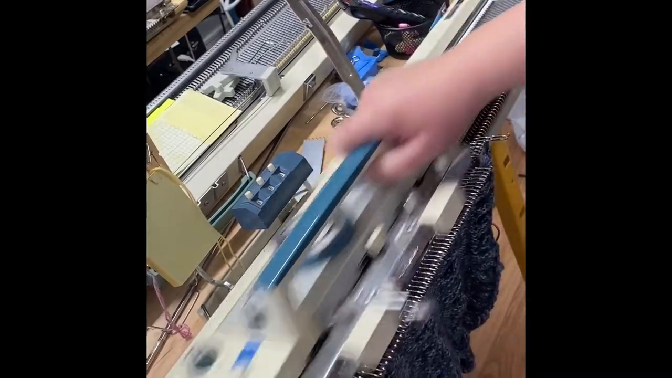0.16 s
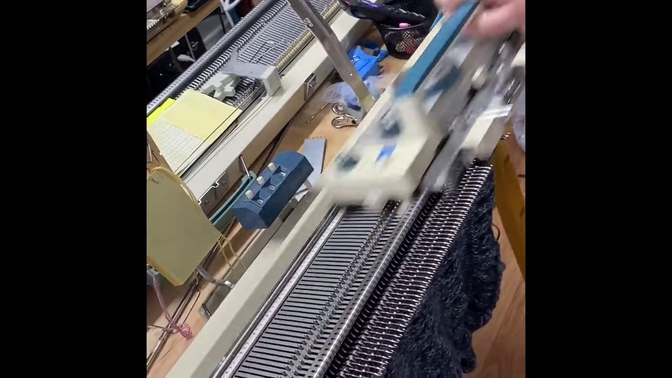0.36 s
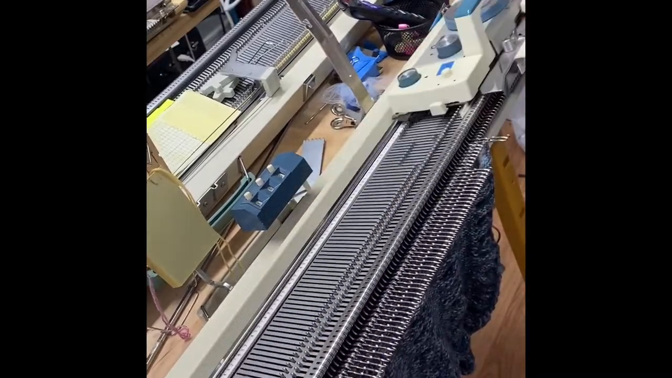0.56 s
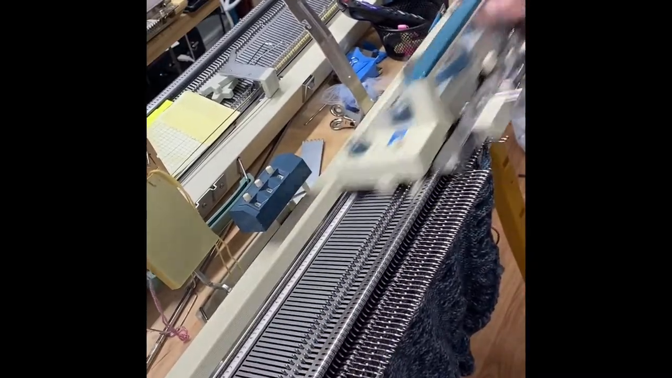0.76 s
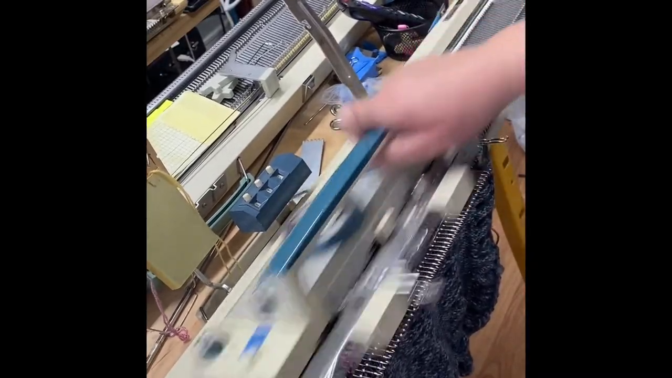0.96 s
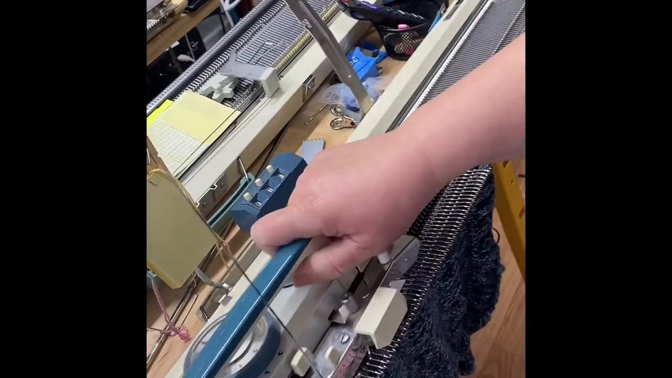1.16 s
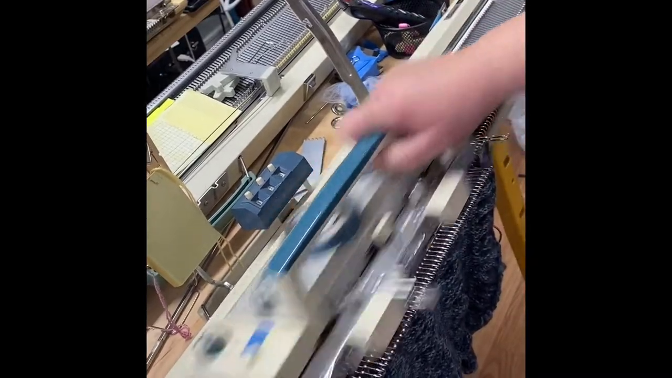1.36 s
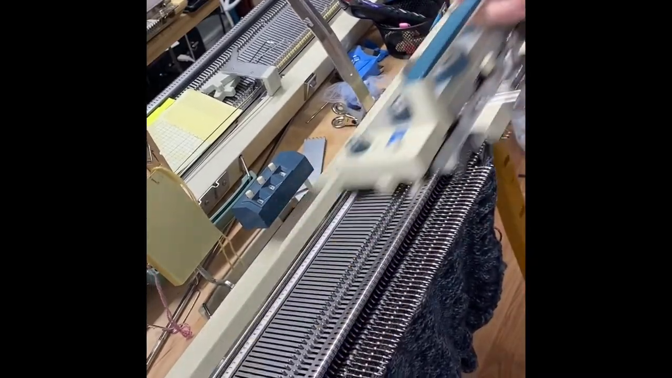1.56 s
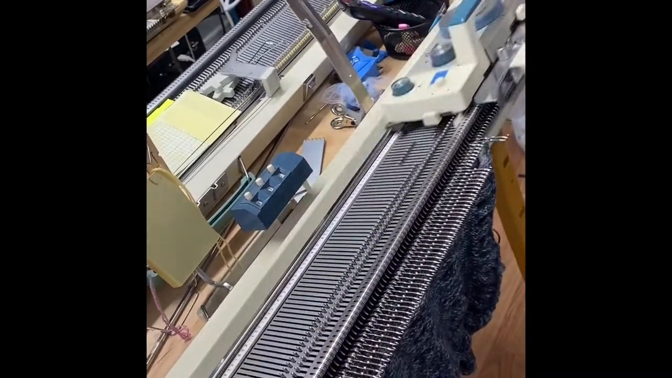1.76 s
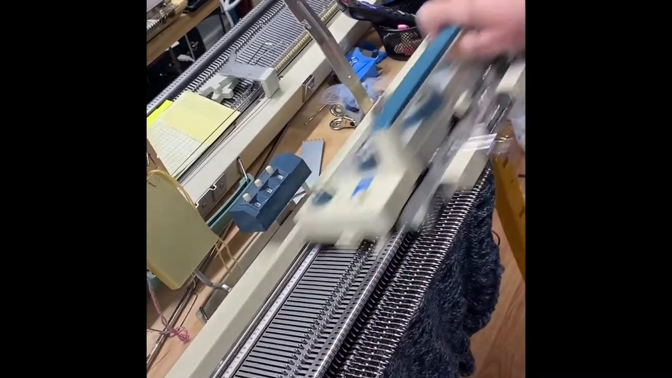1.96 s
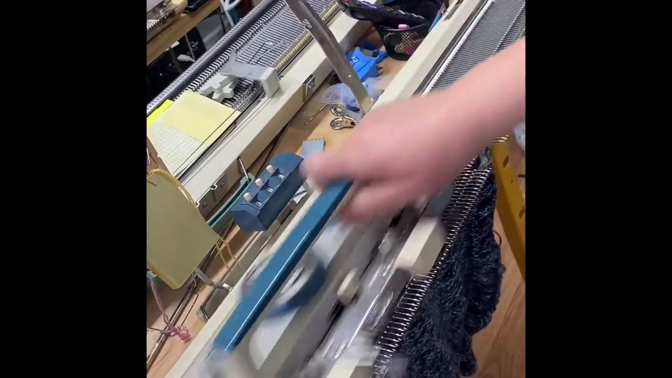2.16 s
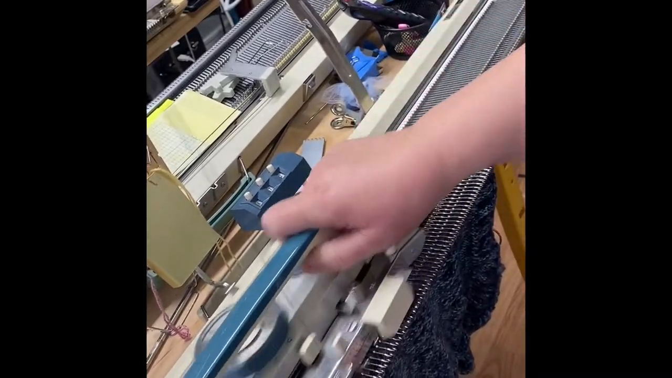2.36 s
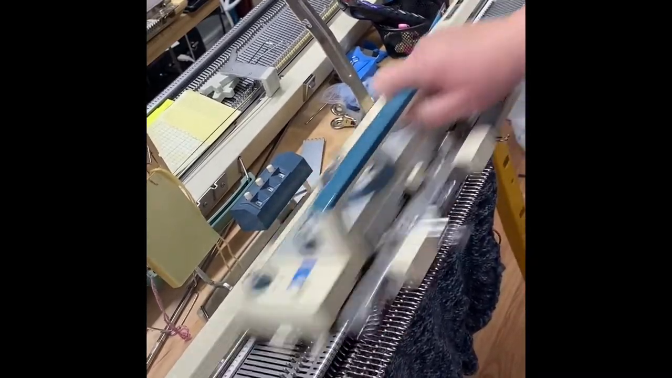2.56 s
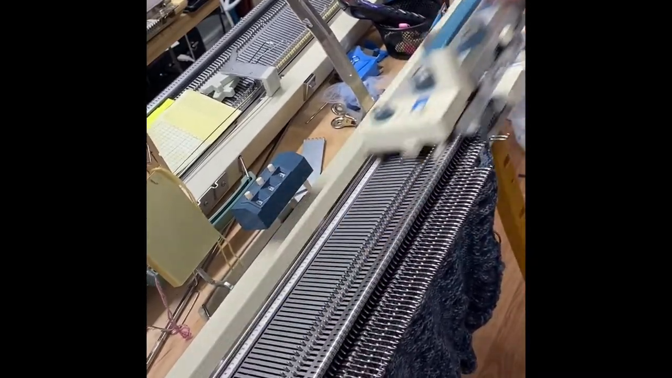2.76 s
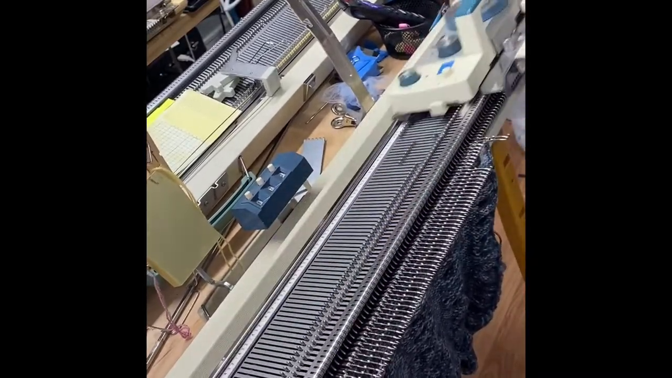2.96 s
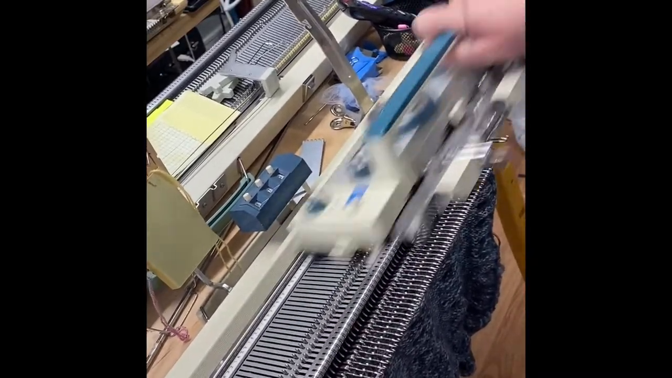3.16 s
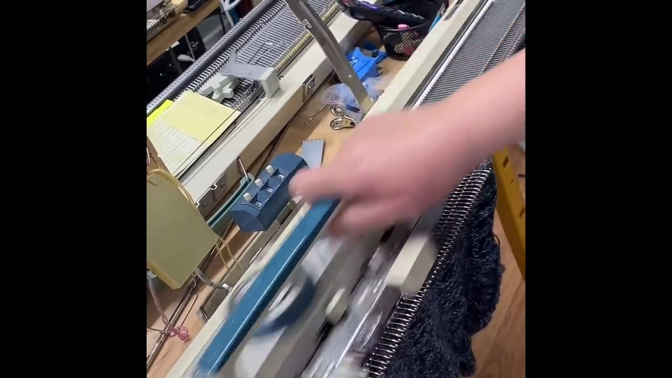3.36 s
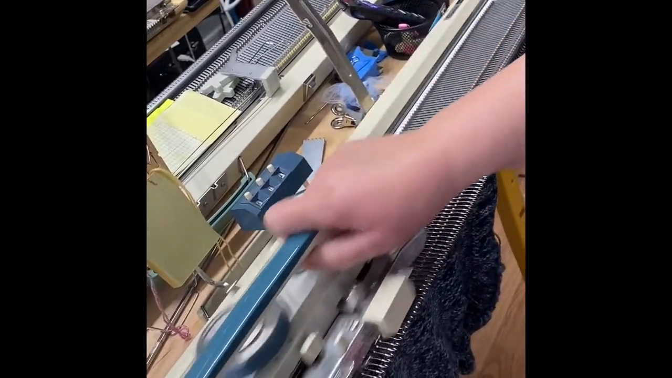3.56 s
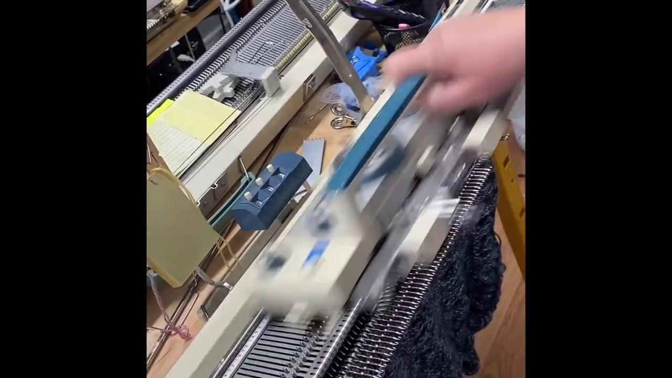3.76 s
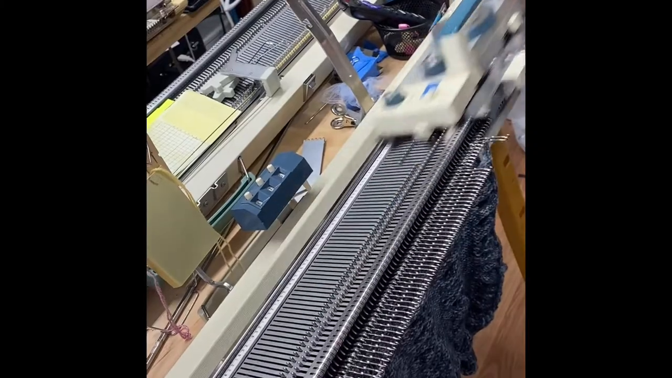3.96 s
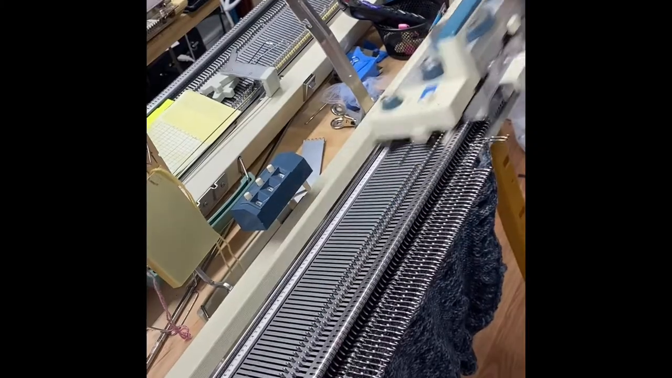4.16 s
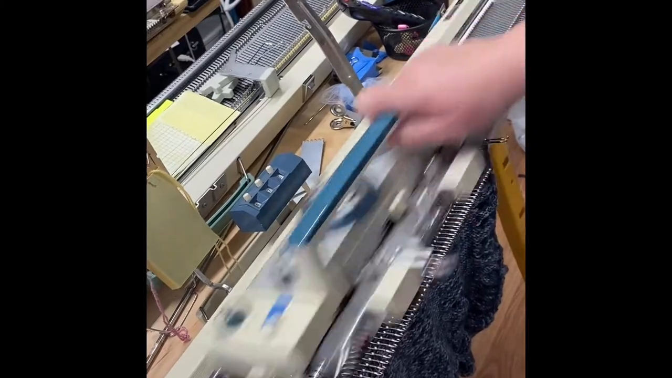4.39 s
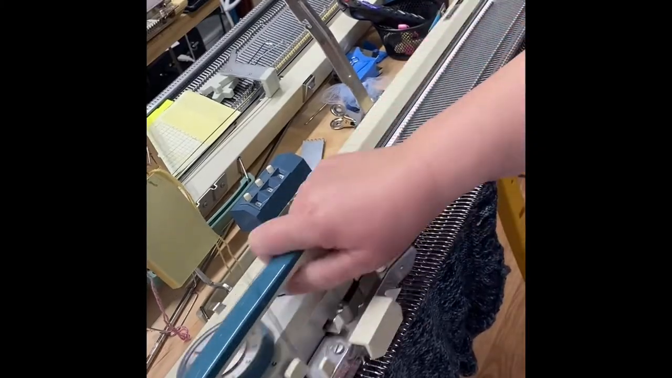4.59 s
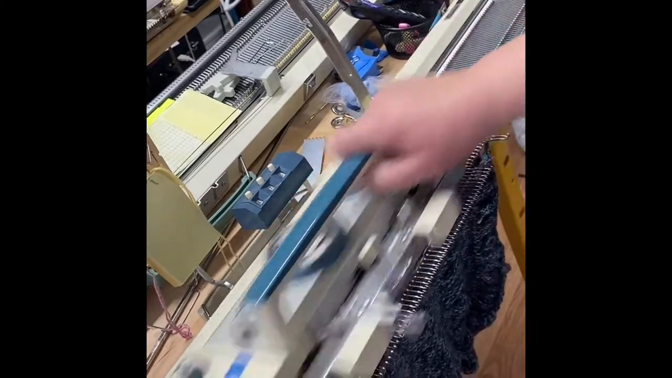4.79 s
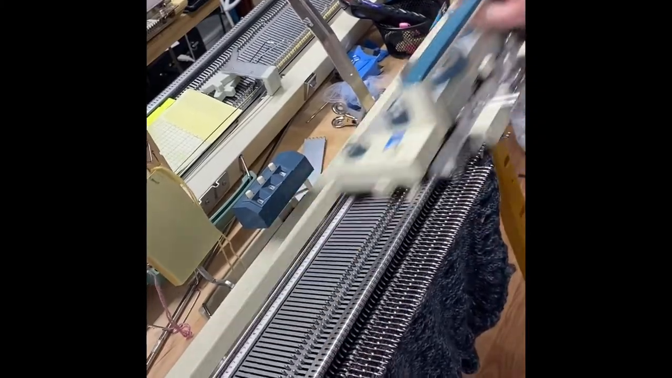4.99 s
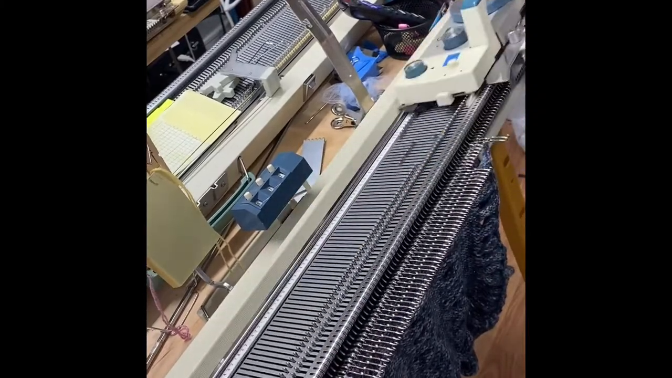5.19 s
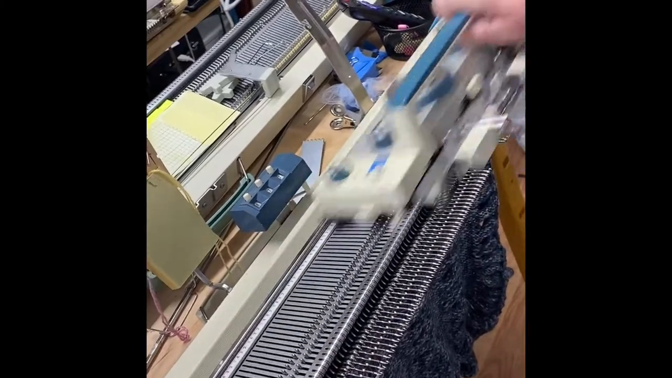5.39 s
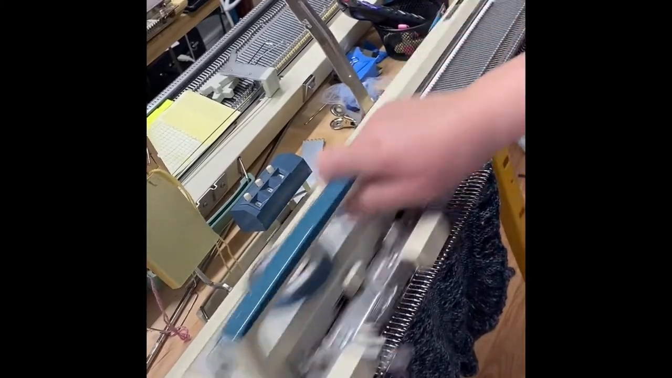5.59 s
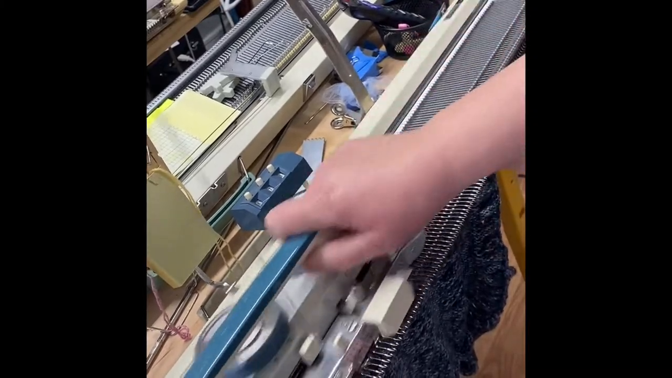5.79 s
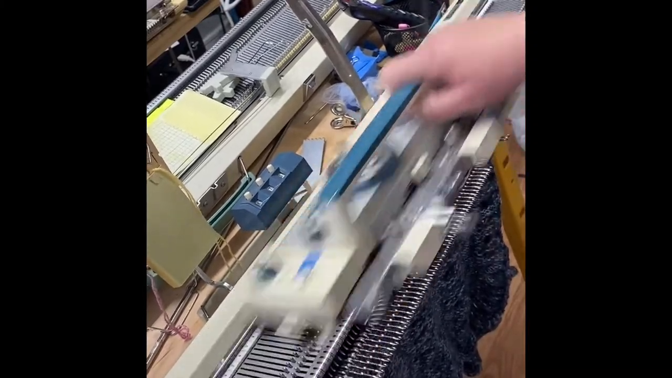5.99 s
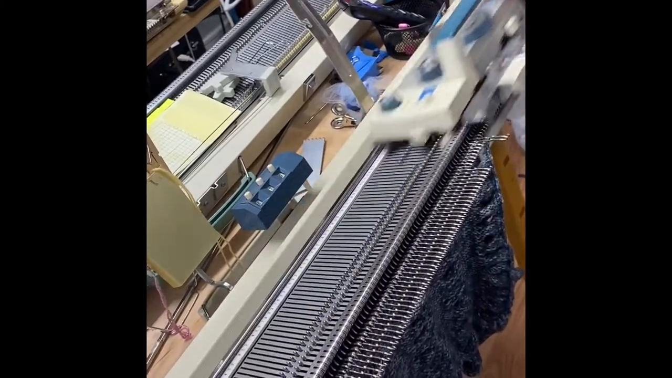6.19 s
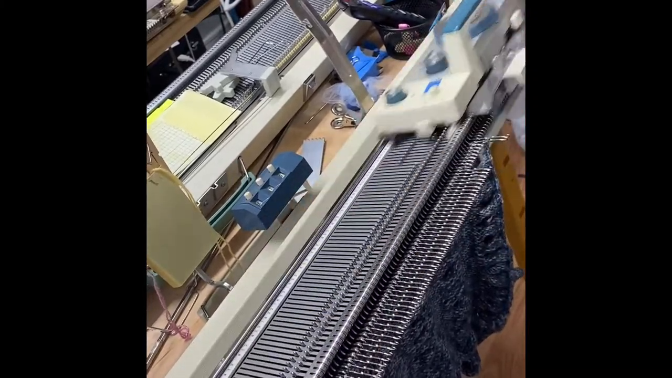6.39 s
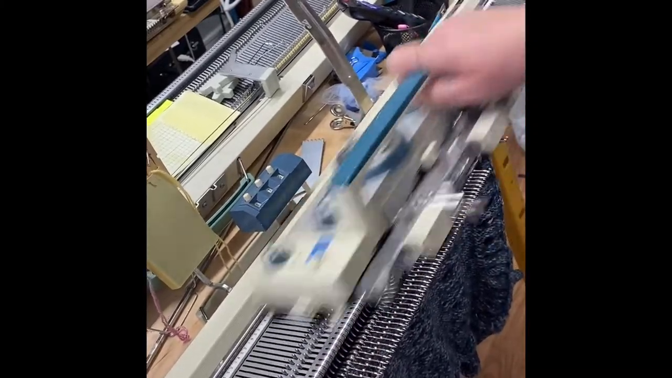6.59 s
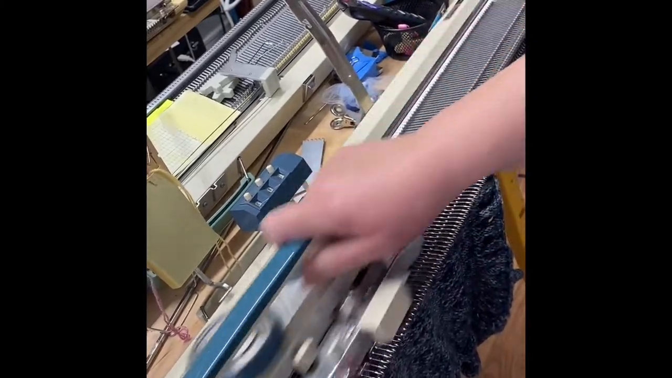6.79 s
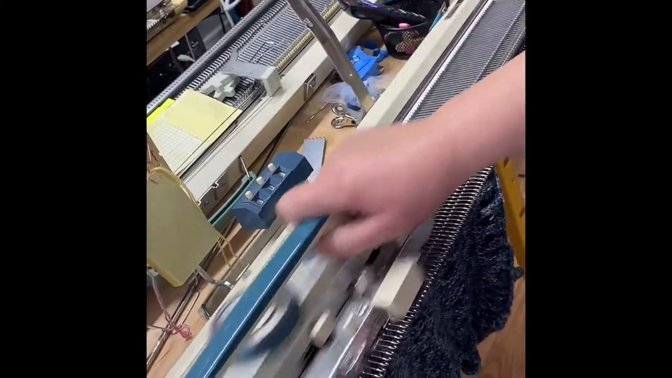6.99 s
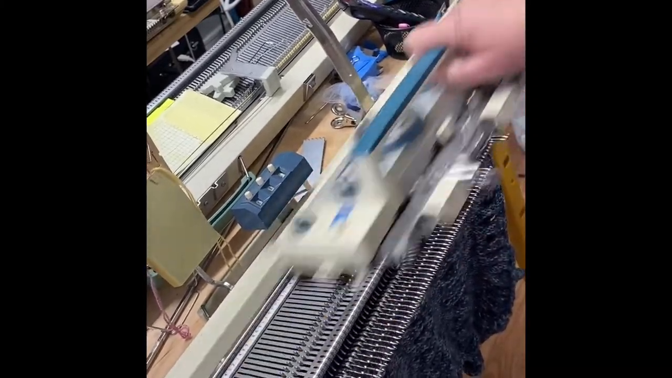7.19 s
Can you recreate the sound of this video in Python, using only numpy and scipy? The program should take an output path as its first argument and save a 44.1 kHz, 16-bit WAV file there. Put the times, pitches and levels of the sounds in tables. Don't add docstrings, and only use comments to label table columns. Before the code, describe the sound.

Quick, even sweeps of a manual knitting carriage, heard very close in stereo: a crisp, noisy metallic zip rises and falls about thirteen times in seven seconds. Steel clatter dominates, over a mid-range plastic rattle and a ringing bed. Brief dips separate the sweeps, with light cam clicks and a few sharper cracks early on. Dull bumps shake the table underneath; the small room adds a short dense tail over faint steady background noise.

```python
import sys
import numpy as np
from scipy import signal
from scipy.fft import rfft, irfft, next_fast_len
from scipy.io import wavfile
from scipy.ndimage import uniform_filter1d

SR = 44100
rng = np.random.default_rng(int(sys.argv[2]) if len(sys.argv) > 2 else 0)


def gain_from_db(level_db):
    decades = np.asarray(level_db, float) / 20
    return 10 ** decades


def transcribe(signal):
    frames = np.atleast_2d(signal).T
    limited = np.clip(frames, -1, 1)
    pcm = np.round(limited * 32767).astype(np.int16)
    wavfile.write(sys.argv[1], SR, pcm)


N = 319284
T = np.arange(N) / SR
SIZE = next_fast_len(N + SR // 2)
HZ = np.arange(SIZE // 2 + 1) * SR / SIZE

# start in seconds, strength in dB,
# lateness of the peak from -1 to 1, shell share in dB, bed share in dB.
STROKES = [(0.002, 0, -0.11, 0.5, 0.5), (0.579, -0.45, 0.08, 1.5, 1), (1.163, 0.34, 0.025, 0.5, 0),
           (1.7335, -0.76, -0.021, 2, 1), (2.309, 0.54, -0.015, 0.5, 0.5), (2.906, 0.17, 0.064, 1, 0.5),
           (3.493, 0.73, 0.032, 0, 0), (4.0646, -0.05, -0.031, 0.5, -0.5), (4.621, 1.43, .01, 0, -1),
           (5.184, -0.26, -0.025, 1, 0.5), (5.748, 0.56, -0.014, 0, -0.5), (6.307, -0.2, -0.03, 0.5, 0),
           (6.887, 0.74, 0.056, 0, -0.5)]
# frequency in Hz, level in dB.
STEEL_COLOUR = [(2500, -30), (4200, -14), (5000, .5), (6400, -.5), (7200, 1), (8500, -.5), (10500, -.5),
                (13000, -2.5), (15700, -4.5)]
# frequency in Hz, level in dB.
SHELL_COLOUR = [(400, -33.5), (800, -13), (1200, -6), (2500, -3), (3700, -2.5), (4300, -6.5), (5200, -13)]
# frequency in Hz, width in Hz, level in dB.
LATCH_MODES = [(5240, 1150, -3.5), (8230, 3900, -4), (9980, 1200, -11.5), (11600, 960, -8.5),
               (14900, 390, -1)]


def unit(x):
    return x / np.sqrt(np.mean(x ** 2))


def on_hz(points):
    hz, value = np.transpose(points)
    return np.interp(np.log(HZ + 1), np.log(hz + 1), value)


def shape(x, gain):
    return irfft(rfft(x, SIZE) * gain, SIZE)[..., :N]


def high_share(split_hz):
    return HZ ** 4 / (HZ ** 4 + float(split_hz) ** 4)


def fade(x, tail_s):
    return signal.lfilter([1], [1, -np.exp(-1 / (tail_s * SR))], x + 1e-18)


def ring(modes):
    return sum(gain_from_db(db) * 1j * HZ * w / (f * f - HZ ** 2 + 1j * HZ * w) for f, w, db in modes)


def resonate(x, hz, width_hz, db):
    return gain_from_db(db) * signal.lfilter(*signal.iirpeak(hz, hz / width_hz, SR), x)


def walk(rate):
    hold = int(SR / rate)
    steps = np.repeat(rng.standard_normal(N // hold + 1), hold)
    return 1.31 * uniform_filter1d(steps, hold)[:N]


def patchy(x, modes, patchy_db, rate):
    return sum(resonate(x * gain_from_db(patchy_db * walk(rate)), *mode) for mode in modes)


def grains(rate_hz, spread_db, tail_s, rub):
    chance = rng.random((2, N))
    hardness_db = np.minimum(-spread_db * np.log(1 - chance[1]), 10.5)
    knocks = (chance[0] < rate_hz / SR) * gain_from_db(hardness_db)
    power = rub + unit(fade(knocks ** 2, tail_s))
    return unit(np.sqrt(power) * rng.standard_normal(N))


def stroke():
    last_turn_s = 7.46
    starts = np.r_[np.transpose(STROKES)[0], last_turn_s]
    swing = np.interp(T, starts, np.arange(len(starts)))
    return swing % 1, swing, swing.astype(int) % 2


def speed():
    done, swing, _ = stroke()
    return np.sin(np.pi * done) ** .75, swing


def carriage():
    steel_gain, shell_gain, bed_gain = levels()
    return gain_from_db(5.5) * steel_gain * steel() + shell_gain * shell() + bed_gain * bed()


def levels():
    # share of the stroke from 0 to 1, steel clatter in dB.
    away = [(0, -50), (.17, -34), (.3, -29), (.4, -25), (.51, -27), (.57, -27), (.76, -31.5), (.87, -40.5),
            (.97, -64.5)]
    # share of the stroke from 0 to 1, steel clatter in dB.
    homeward = [(0, -47.5), (.07, -43.5), (.17, -32), (.38, -26), (.55, -26), (.72, -29.5), (.84, -37),
                (.9, -44.5), (.96, -64)]
    full_db = -25
    done, swing, back = stroke()
    _, strength_db, late, shell_db, bed_db = np.array(STROKES)[swing.astype(int)].T
    done = done - late * np.sin(np.pi * done) / np.pi
    away_db = np.interp(done, *np.transpose(away))
    back_db = np.interp(done, *np.transpose(homeward))
    effort_db = np.where(back, back_db, away_db) - full_db

    def lean(mid_db, lean_db):
        return np.take(mid_db, back) + np.take(lean_db, back) * (done - .5)

    shell_level = gain_from_db(shell_db + 0.95 * effort_db + lean((-1.5, -1.23), (2.5, 10.5)))
    bed_level = gain_from_db(bed_db + 0.56 * effort_db + lean((-21, -21), (-0.5, 5.5)))
    left = .5 + .5 * np.tanh((done - np.take((0.618, 0.746), back)) / 0.0054)
    shell_level = shell_level * gain_from_db(np.take((-1.5, -3.5), back) * left)
    shell_level = shell_level * (1 - 0.21 * np.exp(-done / 0.01))
    bed_level = bed_level * (1 - 0.54 * np.exp(-done / 0.031))
    full = gain_from_db(full_db + strength_db + .8 * walk(40))
    fall_s = 0.01
    boom = fade(fade(np.abs(jolts()), fall_s), fall_s) * np.e / (fall_s * SR)
    boom = gain_from_db(np.take((10, 3.5), back)) * boom
    return full * gain_from_db(effort_db), full * shell_level, np.hypot(full * bed_level, boom)


def steel():
    busy = speed()[0] + .2
    butt = grains(1500 * busy, 1.9, 0.00024, rub=0.96)
    latch = grains(1500 * busy, 1.9, 0.00024, rub=0.96)
    top = high_share(9000)
    colour = gain_from_db(on_hz(STEEL_COLOUR)) * np.sqrt([1 - top, top])
    clatter = shape(np.array([butt, latch]), colour).sum(axis=0)
    clatter = clatter + gain_from_db(-6) * patchy(latch, LATCH_MODES, 4.2, rate=30)
    return unit(clatter) + gain_from_db(-7.5) * needles()


def needles():
    share, swing = speed()
    place = np.cumsum(271.9 * share / SR)
    hits = np.flatnonzero(np.diff(np.floor(place)))
    chance = rng.standard_normal((N // 100, 2))[:len(hits)].T
    moments = np.clip(hits + (8 * chance[0]).astype(int), 0, N - 1)
    knocks = np.zeros(N)
    knocks[moments] = gain_from_db(2.2 * np.clip(chance[1], -2, 1.5))
    burst = np.sqrt(fade(knocks ** 2, 0.00069)) * rng.standard_normal(N)
    burst = burst / np.sqrt(share + 0.44)
    far = gain_from_db(4.6 * -np.cos(np.pi * swing))
    return unit(shape(burst, ring(LATCH_MODES) + 0.72 * gain_from_db(on_hz(STEEL_COLOUR)))) * far


def shell():
    # frequency in Hz, width in Hz, level in dB.
    shell_modes = [(874, 55, -13), (992, 58, -12.5), (3140, 1200, -18), (3804, 64, -12.5)]
    lid_mode = [(1450, 185, -10)]
    plate_mode = [(2069, 38, -1.6)]
    share, swing = speed()
    back = stroke()[2]
    cam = grains(700 * (share + .2), 6.5, 0.0024, rub=0.85)
    body = shape(cam, gain_from_db(on_hz(SHELL_COLOUR))) + patchy(cam, shell_modes, 3, rate=12)
    lid = gain_from_db(np.take((2.5, 0), back)) * patchy(cam, lid_mode, 2.2, rate=15)
    plate = gain_from_db(np.take((2.5, 4.5), back)) * patchy(cam, plate_mode, 2.2, rate=18)
    body = body + share * lid + share ** 2 * plate
    bright = shape(body, high_share(2900))
    near = gain_from_db(2.5 * np.cos(np.pi * swing))
    return unit(near * bright + (body - bright) / near)


def bed():
    # frequency in Hz, level in dB.
    bed_colour = [(100, -21), (200, -14), (400, -6.5), (620, -1.5), (1000, -3), (1600, -33)]
    # frequency in Hz, width in Hz, level in dB.
    bed_modes = [(173, 15, -7.5), (269, 23.6, 2), (334, 9.8, 1), (446.4, 11, -1.5), (717, 5.4, -41)]
    frame = grains(200 * (speed()[0] + .2), 6.2, 0.0032, rub=0.88)
    body = shape(frame, gain_from_db(-2.5 + on_hz(bed_colour)))
    return unit(body + patchy(frame, bed_modes, 2.26, rate=9))


def ticks():
    # moment in seconds, peak in dB, low part relative to the peak in dB.
    tick_events = [(0.583, -30, -10), (0.61, -34, -7), (0.6499, -21, -16), (0.6838, -18, -18),
                   (0.6953, -13, -16), (1.167, -30, -7), (1.4125, -10, -17), (1.736, -27, -20),
                   (1.8163, -12, -22), (1.836, -21, -26), (1.847, -20, -15), (2.3177, -26, -20),
                   (2.331, -35, -18), (2.842, -21, -18), (2.9114, -30, -7), (2.928, -30, -7),
                   (2.9912, -31, -20), (3.499, -30, -11), (4.0674, -26, -16), (4.1283, -22, -5),
                   (4.6254, -34, -15), (5.1871, -32, -9), (5.195, -27, -1), (5.2305, -29, -14),
                   (5.2645, -23, -16), (5.7528, -28, -15), (6.3142, -29, -12), (6.4083, -39, -23),
                   (6.892, -34, -12), (6.9067, -32, -12)]
    high, low = np.zeros((2, N))
    for s, db, low_db in tick_events:
        high[int(s * SR)] = gain_from_db(db)
        low[int(s * SR)] = gain_from_db(db + low_db)
    crack_colour = ring(LATCH_MODES) + .5 * gain_from_db(on_hz(STEEL_COLOUR))
    crack = shape(fade(high, 0.0024) * rng.standard_normal(N), crack_colour)
    knock = shape(fade(low, 0.00066) * rng.standard_normal(N), gain_from_db(on_hz(SHELL_COLOUR)))
    return gain_from_db(-3.0) * crack + gain_from_db(5) * knock


def jolts():
    # moment in seconds, level in dB.
    jolt_events = [(0.12, -70), (.27, -56), (0.348, -49), (0.84, -56), (1.005, -50), (1.069, -54),
                   (1.32, -71), (1.538, -51.5), (1.81, -57), (2.15, -50.5), (2.61, -62), (2.675, -49.5),
                   (2.74, -60), (3.275, -58), (3.375, -56), (3.854, -48), (4.4, -51), (4.478, -51),
                   (4.8, -70), (4.988, -50), (5.5, -54), (5.586, -51), (6.035, -52), (6.098, -49.5),
                   (6.735, -51), (6.81, -56), (7.18, -54)]
    s, db = np.transpose(jolt_events)
    out = np.zeros(N)
    lead_s = 0.0047
    out[((s - lead_s) * SR).astype(int)] = gain_from_db(db)
    return out * (1 - 2 * stroke()[2])


def table():
    # frequency in Hz, width in Hz, level in dB.
    table_modes = [(52.7, 5.2, 5), (68, 16, 3), (85, 16, -8.5), (163, 17, -11.5)]
    done, _, back = stroke()
    jolt = jolts()
    rumble = gain_from_db(np.take((-68, -66), back) + np.take((-2, 2), back) * (done - 2.0))
    rumble = np.hypot(rumble, gain_from_db(-6.5) * fade(np.abs(jolt), .05))
    push_s = 0.0028
    shove = gain_from_db(35) * fade(fade(jolt, push_s), push_s) / (push_s * SR) ** 2
    rocking = sum(resonate(rumble * rng.standard_normal(N) + shove, *mode) for mode in table_modes)
    low_cut = HZ ** 6 / (HZ ** 6 + 46. ** 6)
    return gain_from_db(-55.5) * unit(shape(rocking, low_cut))


def ports(machine):
    # frequency in Hz, phase in radians.
    lead = [(0, 0), (860, .3), (1300, -.1), (2200, 0), (3600, .5), (4400, .8), (5000, .2), (7300, 3.14),
            (10500, 6.28), (13650, 9.42), (16800, 12.56)]
    # frequency in Hz, left minus right in dB.
    balance = [(300, -0.5), (800, 3.5), (1500, -1.5), (2600, -3), (4400, -0.7), (5000, -0.5)]
    half = np.exp(.5j * np.interp(HZ, *np.transpose(lead))) * gain_from_db(on_hz(balance) / 2)
    return shape(machine, np.array([half, 1 / half]))


def room(x, count=4):
    # frequency in Hz, level in dB.
    wet = [(60, -50), (130, -23), (300, -13.5), (700, -0.5), (1800, -15.5), (2600, -4), (4300, -7.5),
           (5000, -8), (8000, -14.5), (16000, -8)]
    t60_s = 0.16
    place = (count - 1) * (1 - np.cos(np.pi * speed()[1])) / 2
    out = 0
    for k in range(count):
        decay = 1000. ** (-np.arange(SR // 2) / (t60_s * SR))
        tail = rng.standard_normal((2, SR // 2)) * decay
        tail /= np.sqrt(np.sum(tail ** 2, axis=1, keepdims=True))
        nearby = np.sqrt(np.clip(1 - np.abs(place - k), 0, 1))
        out = out + rfft(x * nearby, SIZE) * rfft(tail, SIZE)
    return irfft(out * gain_from_db(on_hz(wet)), SIZE)[:, :N]


def house():
    # frequency in Hz, density in dB per Hz.
    floor_colour = [(59, -29), (100, -6), (175, 1), (313, -4.5), (4590, -15), (5390, -39), (7420, -17),
                    (9440, -26), (12000, -38), (15600, -56), (22000, -120)]
    return gain_from_db(-59.5) * unit(shape(rng.standard_normal(N), gain_from_db(on_hz(floor_colour))))


def scene():
    machine = carriage() + ticks() + table()
    return ports(machine) + room(machine) + house()


def band_limit(x):
    return signal.sosfilt(signal.butter(12, 17100, fs=SR, output="sos"), x)


def record(dry):
    return band_limit(dry)


dry = scene()
out = record(dry)
transcribe(out)
```